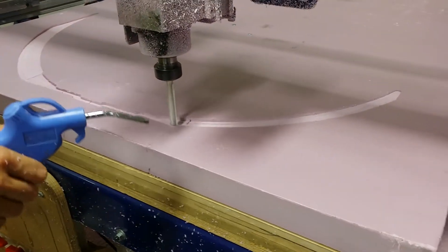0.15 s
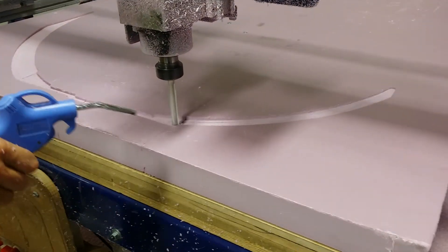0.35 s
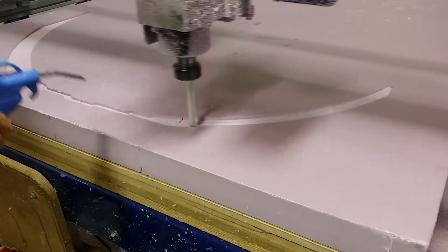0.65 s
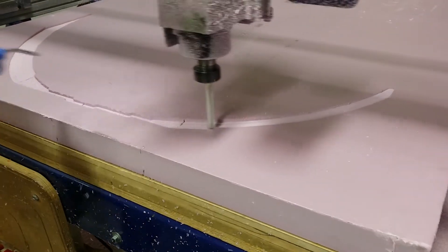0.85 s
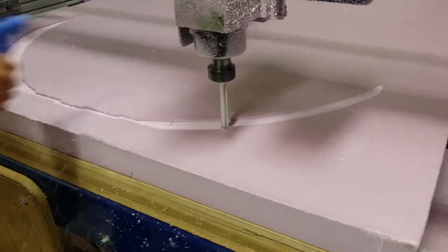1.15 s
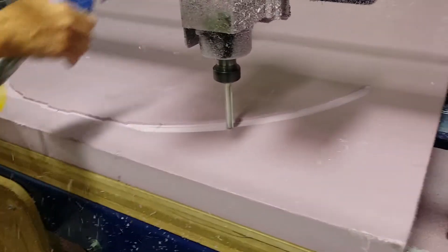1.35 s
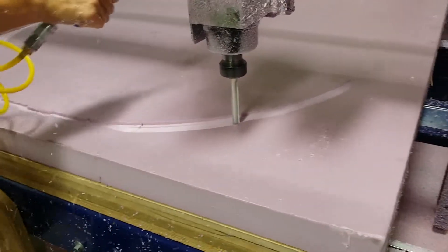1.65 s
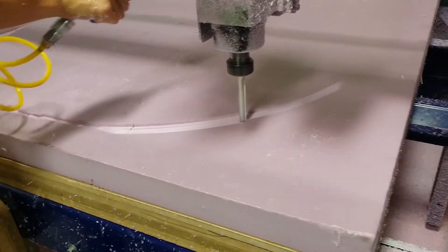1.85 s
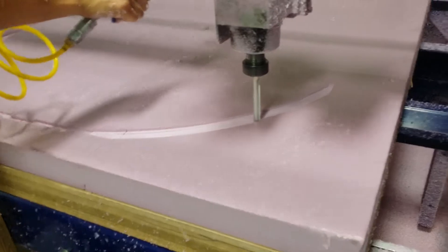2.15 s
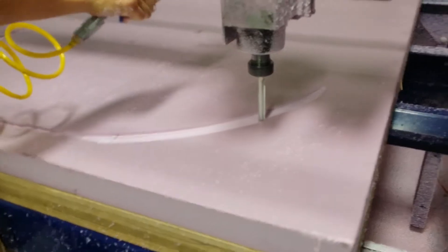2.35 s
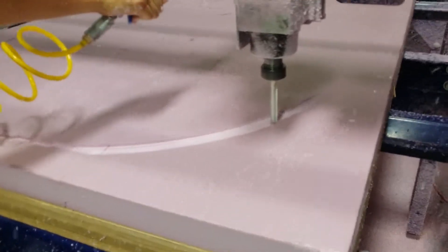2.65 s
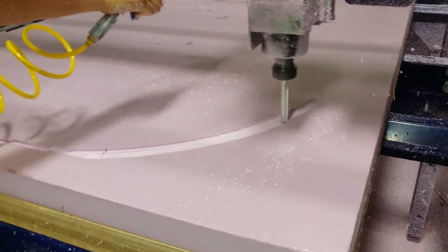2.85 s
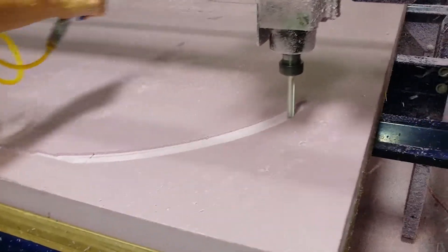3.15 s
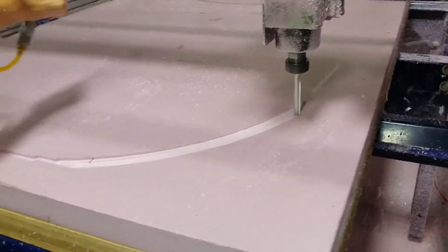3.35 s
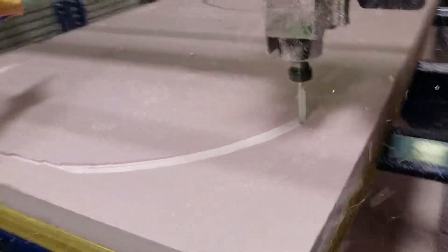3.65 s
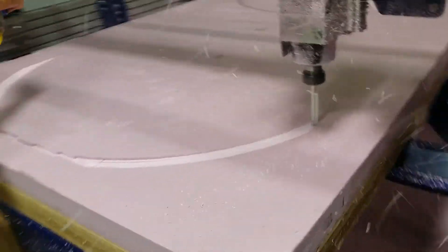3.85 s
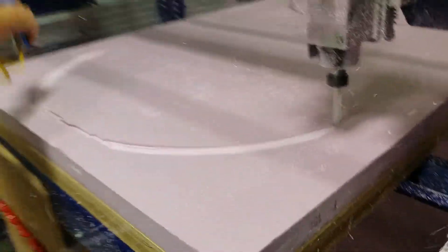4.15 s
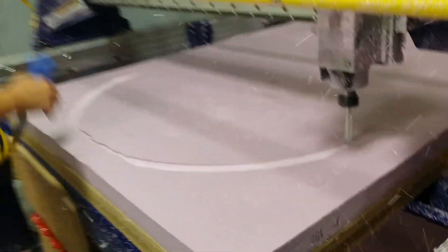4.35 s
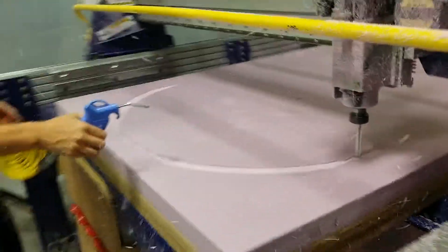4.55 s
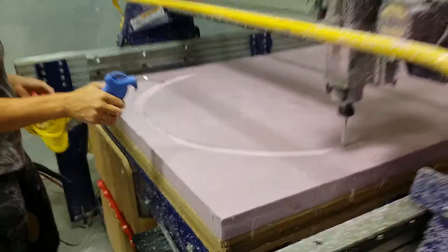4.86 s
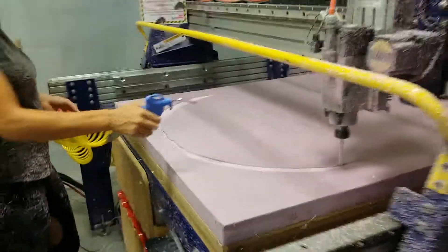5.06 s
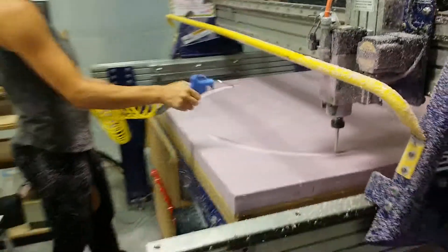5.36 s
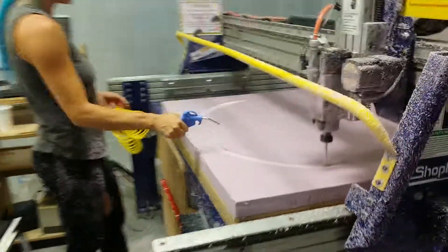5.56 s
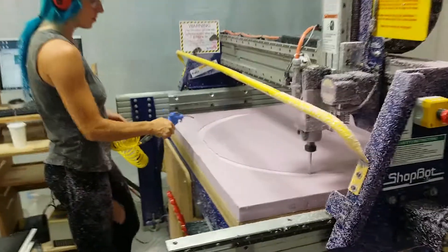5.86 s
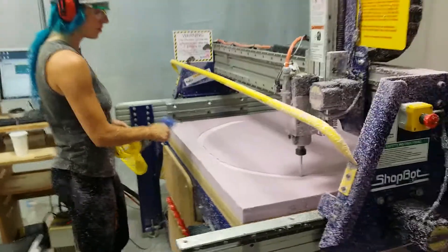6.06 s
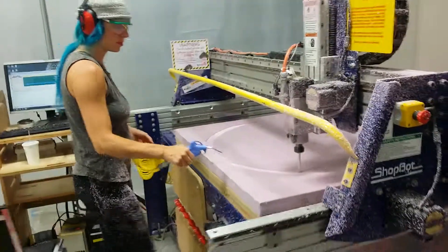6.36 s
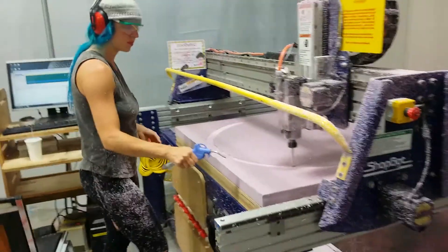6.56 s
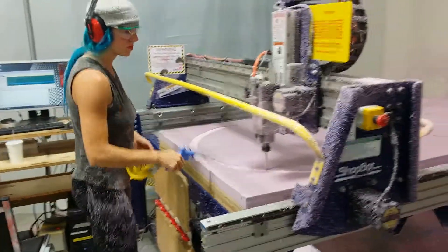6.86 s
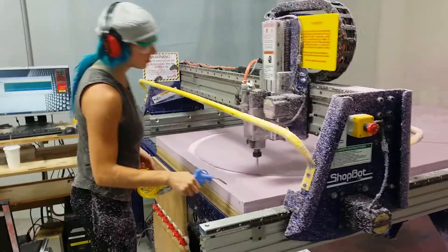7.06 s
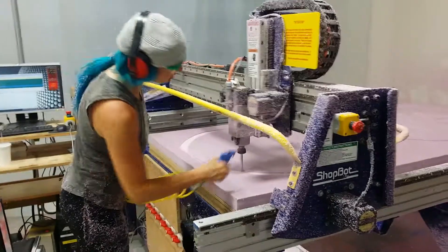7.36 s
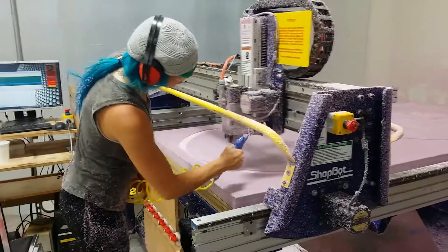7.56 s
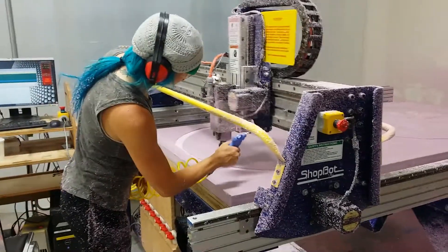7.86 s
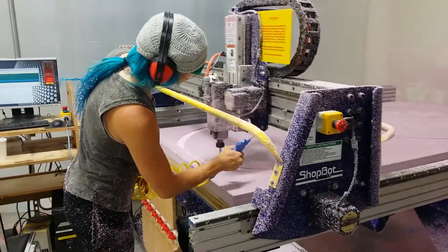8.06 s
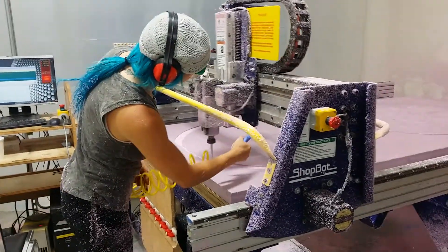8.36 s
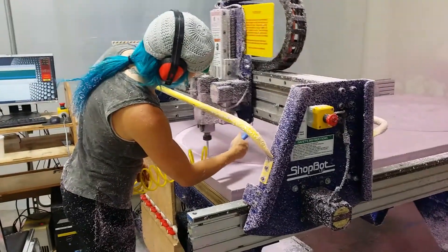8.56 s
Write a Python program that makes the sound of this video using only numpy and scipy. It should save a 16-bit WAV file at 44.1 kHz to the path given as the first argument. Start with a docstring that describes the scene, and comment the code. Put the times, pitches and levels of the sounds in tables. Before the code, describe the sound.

Loud hissing blasts of compressed air come and go over the steady whine and rasp of a machine router cutting foam.

```python
"""Workshop: an air gun blows chips off a CNC router cutting foam board.
The jet hisses in long bursts, roars where it hits the groove and once sweeps over the microphone.
The two-flute bit rasps and briefly chatters; the spindle whines at 300 turns a second.
Background: spindle fan, ringing gantry, drive motor tones, mains hum, shop rumble.
Low sounds sink away under loud hiss."""
import sys
import numpy as np
from scipy import signal
from scipy.fft import rfft, irfft, next_fast_len
from scipy.io import wavfile
from scipy.ndimage import uniform_filter1d, map_coordinates

SR = 44100
rng = np.random.default_rng(int(sys.argv[2]) if len(sys.argv) > 2 else 0)


def bounce(signal):
    """Save signal as a 16-bit WAV file at the path given by the first command-line argument."""
    frames = np.transpose(np.atleast_2d(signal))
    limited = np.clip(frames, -1, 1)
    pcm = np.round(limited * 32767).astype(np.int16)
    wavfile.write(sys.argv[1], SR, pcm)


N = 384993

# air blasts: (fully open [s], released [s], rise [s], fall [s], hiss [dB], sag [dB/s],
# roar re hiss [dB], sizzle re hiss [dB])
AIR_BLASTS = [(0.209, 1.026, 0.068, 0.12, -18.5, 5.5, -41, -2),
              (1.537, 4.006, 0.07, 0.18, -20, 1.4, -13.5, -2.5),
              (5.23, 7.164, 0.27, 0.34, -20.5, 0.04, -58, -3.5),
              (7.696, 8.08, 0.068, 0.27, -22.5, -1, -9, -1.5),
              (7.637, 7.66, .02, 0.045, -33.5, 0, -14, -15), (8.509, 8.585, 0.013, 0.16, -34, 0, -3, -14),
              (8.653, 8.733, 0.12, .1, -20.5, -10, -42, 0)]
# jet catching the groove: (time [s], half length [s], roar [dB], gust [dB], hiss gain [dB],
# sizzle gain [dB])
GROOVE_SURGES = [(0.118, 0.057, -34, -31, 8.5, -3), (0.274, 0.11, -40, -57, -0.5, -4),
                 (0.312, 0.015, -45, -35.5, 2, -2), (0.669, 0.029, -30, -25, 0, 0),
                 (1.596, 0.095, -21, -35, -0.5, 1), (1.96, 0.2, -28, -49, 1.8, -3.5),
                 (2.368, 0.15, -29, -74, 5.5, -24), (2.918, 0.072, -24.5, -55, 5.5, -2),
                 (3.22, 0.33, -59, -81, 2.5, 6.5), (3.47, 0.24, -32, -79, 2, -3),
                 (5.275, 0.2, -36, -67, 1.5, -0.5), (6.984, 0.13, -35.5, -76, -0.5, 1.5),
                 (7.8, 0.1, -30.5, -30.5, 0.5, -1), (8.002, 0.03, -22.5, -46, -0.5, 4.5)]
# nozzle-board gap: (time [s], half length [s], centre [Hz], half width [Hz], gain [dB])
GAP_RESONANCES = [(.4, 0.96, 6800, 503, 6), (.6, 0.27, 10660, 400, 8), (0.556, 0.1, 9600, 400, 9),
                  (1.7, 0.34, 1090, 200, 5.5), (2.25, 0.44, 5840, 450, 4.5), (2.352, 0.17, 7600, 400, 2),
                  (2.874, 0.025, 4870, 400, 6), (2.974, 0.022, 890, 227, 19),
                  (3.055, 0.075, 10600, 600, 13.5), (3.172, 0.13, 8950, 400, 7),
                  (3.5, 0.51, 11200, 400, 8.5), (3.315, 0.54, 3870, 610, -4.5), (3.5, 0.32, 5170, 400, 1.5),
                  (3.6, 0.59, 7030, 500, 4.5), (3.2, 0.96, 13000, 400, -10), (4.8, 0.52, 10700, 900, -17),
                  (5.318, 0.38, 7400, 600, 7), (6.3, 1, 4760, 1130, -4), (6.9, 0.24, 10300, 400, 7),
                  (7.655, 0.047, 6500, 900, 8), (7.9, 1, 7940, 900, 5), (7.963, 0.058, 3920, 745, 5.5),
                  (8.52, 0.048, 4140, 344, 9)]
# jet position: (time [s], left-right [dB])
JET_BALANCE = [(0, -1.3), (1.5, 0.5), (4.2, 1), (5.2, -1), (5.7, -3), (6.3, -1), (7.2, -2), (8.1, -1.5),
               (8.73, -1)]
# noise spectra: (frequency [Hz], level [dB])
HISS_SPECTRUM = [(1240, -105), (2100, -11.5), (2610, -8.5), (3720, -4.5), (4700, 0), (9030, 1), (10800, -2),
                 (12000, -6.5), (13900, -1), (14600, -23)]
ROAR_SPECTRUM = [(200, -80), (400, -99), (540, -32), (800, -20), (1020, -5.5), (1350, -5), (1680, -7),
                 (1900, -5), (2350, 0.5), (3300, 0), (4500, -4.5), (6500, -7), (11000, -45)]
SIZZLE_SPECTRUM = [(3000, -90), (8000, -11), (11000, -2), (12900, -1.5), (14600, -8)]
PUFF_SPECTRUM = [(25, -28), (55, -16), (90, 7.5), (170, 1.5), (300, -3), (500, -9), (900, -6), (1500, -11),
                 (3000, -16), (5000, -24), (9000, -56)]
# soft low bump at 2.14 s; jet striking the microphone at 3.14 s:
# (time [s], level [dB], half length [s])
LOW_PUFFS = [(2.14, -46, .022), (3.14, -27, .002), (3.146, -25, .003), (3.143, -32, .022), (3.15, -51, .07)]

# bit in the foam: (time [s], level [dB])
RASP_LEVEL = [(0, -34.5), (1.1, -30.5), (1.45, -30.5), (3.9, -35), (4.15, -33.5), (4.5, -35), (4.58, -47),
              (4.85, -47), (5.2, -51), (5.6, -63), (7.0, -32), (7.5, -32.5), (8.2, -34.5), (8.44, -36),
              (8.47, -37), (8.73, -43)]
CHATTER_LEVEL = [(3.8, -61), (4.05, -35), (4.2, -32.5), (4.5, -31), (4.53, -35), (4.59, -57)]
# rasp of the flutes: (frequency [Hz], level [dB])
RASP_SPECTRUM = [(400, -66), (620, -25), (800, -10), (970, -11), (1100, 2.5), (1300, -13.5), (1620, -1),
                 (1900, -3.5), (2400, -1), (3500, 0), (5000, 1), (7000, 2.5), (9000, -4), (10800, -3),
                 (12200, -5.5), (14400, -17)]
# ringing of the bit: (frequency [Hz], level re rasp [dB])
BIT_MODES = [(2930, -19.5), (6530, -15)]
# chatter lines: (frequency [Hz], level [dB], swell time [s], half length [s], swell [dB])
CHATTER_LINES = [(1720, -16.5, 4.18, .08, 3), (2080, -22, 4.25, .1, 2), (2362, -13, 4.09, .03, 9),
                 (2960, -18, 4.25, .1, 2), (3550, -12, 4.13, .03, 3), (4155, -15.5, 4.35, .025, 7),
                 (4760, -17, 4.46, .05, 9), (5065, -17, 4.46, .05, 6), (5300, -15, 4.25, .07, 5),
                 (5368, -8.5, 4.47, .04, 4), (5940, -17, 4.45, .1, 2)]

# spindle orders 1-4: (time [s], imbalance [dB], flutes [dB], third [dB], flute overtone [dB])
ORDER_LEVELS = [(0, -46.5, -39, -38, -49), (.45, -47.5, -48, -53, -46.5), (.8, -45, -39.5, -49, -40.5),
                (1.1, -45, -35.5, -48, -41), (1.48, -43.5, -37, -44, -43), (1.68, -43.5, -39, -46, -45),
                (2.05, -45, -44.5, -47, -48), (2.5, -48.5, -49.5, -49.5, -49),
                (2.75, -46.5, -50.5, -45.5, -43.5), (3.4, -53, -52, -51, -57),
                (3.85, -50, -47.5, -46, -45.5), (4.25, -53, -54.5, -58, -51), (4.68, -49, -59, -60, -59),
                (5.17, -44, -44.5, -52, -40.5), (5.4, -51, -48.5, -60, -57), (5.8, -52.5, -47, -72, -70),
                (6.15, -53, -53.5, -68, -50), (6.5, -53, -52, -51, -53), (7.1, -51.5, -45, -49, -54),
                (7.3, -52, -40.5, -46, -53), (7.75, -47.5, -42, -50, -51), (8.05, -51.5, -46.5, -57, -45),
                (8.4, -56.5, -46, -60, -51), (8.73, -59, -49, -60, -57)]
# whirr of fan and bearings: (time [s], level [dB])
WHIRR_LEVEL = [(0, -26), (.5, -32), (1.3, -35), (3, -30), (4.3, -38.5), (4.65, -38), (5.1, -28.5),
               (5.6, -33.5), (6.8, -31.5), (7.4, -33), (8.73, -41)]
# higher spindle tones: (order [per turn], level re whirr [dB])
MID_ORDERS = [(5, -22), (6, -25.5)]
WHINE_ORDERS = [(8, -28), (10, -26), (15, -26), (16, -20), (21, -24), (22, -14), (23, -18), (26, -19),
                (28, -20)]
# fan noise: (frequency [Hz], level [dB])
FAN_SPECTRUM = [(300, -70), (700, -50), (1200, -14), (1850, -9.5), (2400, 1), (3500, 0), (4300, -3),
                (5300, 4.5), (6700, 7), (8300, 2.5), (9500, 4), (11000, -4), (14600, -8)]

# gantry resonances: (centre [Hz], half width [Hz], gain [dB])
GANTRY_MODES = [(765, 26, 1), (1067, 14, 0.5), (1617, 22, -4), (1735, 26, 2), (2090, 35, 3),
                (2278, 35, 0.5)]
# shaking of the gantry by the cut: (frequency [Hz], level [dB])
GANTRY_DRIVE = [(350, -25), (700, 2.5), (2400, 2), (5000, -20)]
# gantry ringing, drive motor drone: (time [s], level [dB])
GANTRY_LEVEL = [(0, -38), (.6, -59), (1.2, -52), (2.2, -51), (3.5, -55), (4.6, -55), (5.4, -51), (6.3, -47),
                (7.0, -48), (7.5, -44.5), (8.2, -50), (8.73, -49)]
MOTOR_LEVEL = [(0, -48), (.6, -77), (4.3, -55), (4.65, -52), (4.95, -43.5), (5.25, -39), (5.55, -49),
               (6.75, -53), (7.3, -82), (8.73, -72)]
# drive motor tones: (frequency [Hz], level [dB])
MOTOR_TONES = [(816, -4.5), (869, -11)]
# shop background: (time [s], rumble [dB], hollow rush [dB])
SHOP_LEVELS = [(0, -44.5, -40), (.45, -51, -49), (1.2, -48, -40.5), (2.2, -52, -47), (3.05, -47.5, -40.5),
               (3.5, -52.5, -55), (3.85, -50.5, -36.5), (4.35, -49, -44), (4.85, -44.5, -41),
               (5.16, -34.5, -32), (5.3, -41.5, -45), (5.5, -50.5, -49), (6.3, -49.5, -54.5),
               (7.0, -49.5, -48), (7.62, -41.5, -39.5), (7.85, -48, -29), (8.05, -50.5, -33),
               (8.25, -51, -45.5), (8.73, -49.5, -51)]
# shop rumble, air over the table: (frequency [Hz], level [dB])
RUMBLE_SPECTRUM = [(20, -29), (50, -11), (80, 0.5), (115, 6), (150, 1), (190, 0), (260, -3), (340, -2.5),
                   (430, -33), (800, -40), (2000, -90)]
HOLLOW_SPECTRUM = [(100, -92), (250, -4), (370, -0.5), (435, -7), (490, -4), (560, 4), (700, 6.5), (850, 8),
                   (980, -1), (1130, -2.5), (1280, -10), (1420, 3), (1540, -5), (1720, 3), (1900, -38),
                   (2100, -42), (4000, -32), (9000, -60)]
# balance of the two microphone ports: (frequency [Hz], left-right [dB])
PORT_BALANCE = [(60, -2.5), (300, -3.5), (600, -5.5), (1000, -4.5), (2000, -10), (3000, -9), (5000, -6.5),
                (6000, -4.5), (7000, -6), (8200, -12), (10000, -10.5), (11000, -11.5), (12200, -4.5),
                (14000, -5)]
# likeness of the ports: (frequency [Hz], correlation [0-1])
PORT_COHERENCE = [(100, 0.64), (600, 0.34), (1200, 0.14), (2500, 0.089), (5000, 0.031), (14000, 0.018)]

RAMP_DB, SIZZLE_STEEPNESS = 16.5, 1.4  # change per rise or fall time; factor for the sizzle
TAIL_DB, TAIL_DB_PER_S = -11, 28.5
SURGE_EXPONENT = 3.1
EDDY_S, EDDY_LENGTH_S, EDDY_DB = 3.145, .0032, -21
GRIP_RATE_HZ, GRIP_DEPTH, SCRAPE_DEPTH = 110, .72, .42
TURN_HZ, MAINS_HZ, TOP_HZ = 299.8, 120, 14700
REPEAT_GAIN, REPEAT_TOP_HZ = .7, 9500
COVER_LOW_HZ, COVER_HIGH_HZ, COVER_LEAN_DB = 2200, 4500, 1
SHAKE_MARGIN_DB, SHAKE_DB, SHAKE_RAD, SHAKE_RATE_HZ = 11, 5, .6, 45
SINK_MARGIN_DB, SINK_KNEE_DB = 18, 0.37
TURN_SINK_DB, FLUTE_SINK_DB = 52, 35
RUMBLE_SINK_DB, HOLLOW_SINK_DB, HOLLOW_BASS_SINK_DB = 61, 3.5, 39


def air_gun(angle):
    """Jet hiss shaped by the gap, roar and gusts from the groove, nozzle sizzle, flying chips."""
    hiss_gain, roar_gain, gust_gain, sizzle_gain = jet_gains()
    pan_db, = curves(JET_BALANCE)
    hiss = hiss_gain * amp(-1.11) * rush(HISS_SPECTRUM, patchy_db=2.5, patch=(7, 11), resonance=gap_db)
    roar = roar_gain * amp(-2 + 1.1 * wobble(25))
    roar = roar * rush(ROAR_SPECTRUM, patchy_db=9.5, patch=(2, 7), resonance=gap_db)
    sizzle = sizzle_gain * amp(-3 + 0.3 * wobble(2.7))
    sizzle = sizzle * rush(SIZZLE_SPECTRUM, patchy_db=5.5, patch=(4, 9))
    gust = gust_gain * amp(-6.5) * rush(HOLLOW_SPECTRUM, patchy_db=10, patch=(2, 5))
    bit_chop = 1 + 0.017 * np.cos(angle) + 0.011 * np.cos(2 * angle)
    turbulence = amp(0.46 * wobble(30) + 0.27 * wobble(250))
    return (hiss + roar + gust + sizzle) * bit_chop * turbulence * pan(pan_db) + chips(hiss_gain)


def jet_gains():
    """Hiss, roar, gust and sizzle gains: blasts rise, sag, fall, linger; the groove adds surges."""
    t = np.arange(0, N, 32) / SR
    hiss = roar = gust = sizzle = 0
    for on_s, off_s, rise_s, fall_s, db, sag_db_per_s, roar_db, sizzle_db in AIR_BLASTS:
        shut_db = RAMP_DB * np.maximum(0, np.maximum((on_s - t) / rise_s, (t - off_s) / fall_s))
        open_db = db - sag_db_per_s * np.clip(t - on_s, 0, off_s - on_s)
        tail_db = open_db + TAIL_DB - TAIL_DB_PER_S * np.abs(t - off_s)
        room_tail = (t > off_s) * amp(tail_db) * (1 - amp(-shut_db))
        hiss = hiss + np.hypot(amp(open_db - shut_db), room_tail)
        roar = roar + amp(open_db + roar_db - shut_db)
        sizzle = sizzle + amp(open_db + sizzle_db - SIZZLE_STEEPNESS * shut_db)
    for at_s, half_s, roar_db, gust_db, hiss_db, sizzle_db in GROOVE_SURGES:
        swell = np.exp(-np.abs((t - at_s) / half_s) ** SURGE_EXPONENT)
        roar = np.hypot(roar, amp(roar_db) * swell)
        gust = gust + amp(gust_db) * swell
        hiss = hiss * amp(hiss_db * swell)
        sizzle = sizzle * amp(sizzle_db * swell)
    return curves(np.transpose([t, hiss, roar, gust, sizzle]))


def gap_db(hz, t):
    """Resonances of the nozzle-board gap swell and fade as the nozzle moves."""
    return sum(db * bell(t, at_s, half_s) * bell(hz, centre_hz, half_hz)
               for at_s, half_s, centre_hz, half_hz, db in GAP_RESONANCES)


def chips(jet_gain, rate_hz=45, decay_s=0.00092):
    """Chips tick against the machine, harder in a stronger jet."""
    hits = (rng.random(N) < rate_hz / SR) * np.sqrt(rng.exponential(size=N))
    t = np.arange(256) / SR
    tick = rng.standard_normal((2, len(t))) * np.exp(-t / decay_s)
    ticks = signal.fftconvolve(hits[None], tick, axes=1)[:, :N]
    return jet_gain * amp(-22) * spread(ticks, lambda hz: amp(along(HISS_SPECTRUM, hz)))


def puffs():
    """A soft low bump; a second later the jet buffets the microphone. Both mostly on the right."""
    t = np.arange(N) / SR
    swell = sum(amp(db) * bell(t, at_s, half_s) for at_s, db, half_s in LOW_PUFFS)
    u = (t - EDDY_S) / EDDY_LENGTH_S
    eddy = amp(EDDY_DB) * (1 - 2 * u ** 2) * np.exp(-u ** 2)  # suction, push, suction
    return swell * rush(PUFF_SPECTRUM, patchy_db=2) * amp([[-16], [3]]) + eddy * amp([[-20], [5]])


def cutting(angle):
    """The flutes rasp through the foam, slightly louder at each bite; the bit rings faintly."""
    level_db, = curves(RASP_LEVEL)
    bite = 1 + 0.025 * np.cos(angle) + 0.017 * np.cos(2 * angle)
    ring = sum(amp(db) * squeal(hz) for hz, db in BIT_MODES)
    gain = amp(level_db + 0.69 * wobble(25)) * bite
    return gain * (rush(RASP_SPECTRUM, patchy_db=8.5, patch=(3, 7)) + ring)


def chatter():
    """The bit rubs the groove wall; rough lines take the lead in turn."""
    level_db, = curves(CHATTER_LEVEL)
    t = np.arange(N) / SR
    return sum(amp(level_db + db + swell_db * bell(t, at_s, half_s)) * squeal(hz)
               for hz, db, at_s, half_s, swell_db in CHATTER_LINES)


def squeal(hz):
    """Rough line, rms 1, shaken by the bit's changing grip and faster scraping."""
    grip = 1 + GRIP_DEPTH * (wobble(GRIP_RATE_HZ) + 1j * wobble(GRIP_RATE_HZ))
    grip = grip + SCRAPE_DEPTH * wobble(300)
    phase = 2 * np.pi * hz * np.arange(N) / SR + np.angle(grip)
    arrival_rad = .5 * np.array([wobble(12), wobble(12)]) + np.array([[0], [np.pi / 2]])
    line = np.abs(grip) * np.cos(phase + arrival_rad) * pan(along(PORT_BALANCE, hz))
    return line / np.std(line.mean(0))


def spindle(angle, whirr_db, cover_db):
    """Imbalance sounds once a turn, the flutes twice; fan and bearings add the high orders."""
    turn_db, flute_db, third_db, overtone_db = curves(ORDER_LEVELS)
    turn_db = turn_db - TURN_SINK_DB * sunk(turn_db + 0.5 + 1.93 * wobble(27), cover_db)
    flute_db = flute_db - FLUTE_SINK_DB * sunk(flute_db + 3 + 3.9 * wobble(23), cover_db)
    orders = [(1, turn_db), (2, flute_db), (3, third_db), (4, overtone_db)]
    orders += [(order, whirr_db + db) for order, db in MID_ORDERS]
    hum = sum(low_order(order, angle, db, cover_db) for order, db in orders)
    whine = sum(amp(db) * tone(order * TURN_HZ, order * angle, waver_db=3.5, scatter_rad=.9)
                for order, db in WHINE_ORDERS)
    return hum + amp(whirr_db) * whine


def low_order(order, angle, level_db, cover_db):
    """Low spindle tone; wavers more under loud hiss."""
    shake = .5 + .5 * np.tanh((cover_db - level_db - SHAKE_MARGIN_DB) / 4)
    phase = order * angle + shake * SHAKE_RAD * wobble(SHAKE_RATE_HZ)
    flutter_db = shake * SHAKE_DB * np.minimum(wobble(SHAKE_RATE_HZ), 1)
    return amp(level_db + flutter_db) * tone(order * TURN_HZ, phase, waver_db=1.8, scatter_rad=.7)


def fan(angle, whirr_db):
    """Fan noise partly repeats every turn, which gathers it into fuzzy lines."""
    def comb(hz):
        repeat = REPEAT_GAIN / (1 + (hz / REPEAT_TOP_HZ) ** 6)
        return 1 / (1 - repeat * np.exp(-2j * np.pi * hz / TURN_HZ))
    pulse = 1 + 0.24 * np.cos(angle) + 0.44 * np.cos(2 * angle)
    return amp(whirr_db - 1) * unit(pulse) * rush(FAN_SPECTRUM, patchy_db=3, patch=(4, 7), response=comb)


def gantry():
    """The cut shakes the gantry's narrow resonances into a ragged hum."""
    def modes(hz):
        return sum(amp(db) / (1 + ((hz - centre_hz) / half_hz) ** 2)
                   for centre_hz, half_hz, db in GANTRY_MODES)
    level_db, = curves(GANTRY_LEVEL)
    return amp(level_db) * rush(GANTRY_DRIVE, patchy_db=10, patch=(3, 5), response=modes)


def drive_motors():
    """Motor drone, swelling to its loudest around 5.2 s."""
    level_db, = curves(MOTOR_LEVEL)
    t = np.arange(N) / SR
    return sum(amp(level_db + db) * tone(hz, 2 * np.pi * hz * t, waver_db=3, scatter_rad=.7)
               for hz, db in MOTOR_TONES)


def shop(cover_db):
    """Rumble, mains hum and the hollow rush of air over the table; the bass sinks under loud hiss."""
    rumble_db, hollow_db = curves(SHOP_LEVELS)
    sink = sunk(rumble_db + 1.42 * wobble(7.4), cover_db)
    hum = tone(MAINS_HZ, 2 * np.pi * MAINS_HZ * np.arange(N) / SR, waver_db=2.5, scatter_rad=.8)
    low_gain = amp(rumble_db - 1 - RUMBLE_SINK_DB * sink + 0.67 * wobble(12))
    rumble = rush(RUMBLE_SPECTRUM, patchy_db=8.5, patch=(2, 4))
    hollow_gain = amp(hollow_db - 2.5 - HOLLOW_SINK_DB * sink + .6 * wobble(12))
    hollow = hollow_gain * rush(HOLLOW_SPECTRUM, patchy_db=8.5, patch=(3, 4))
    bass = filtered(hollow, lambda hz: 1 / (1 + (hz / 520) ** 12))
    bass_sink = sunk(rumble_db - 0.5 + 0.42 * wobble(11), cover_db)
    hollow = hollow - bass * (1 - amp(-HOLLOW_BASS_SINK_DB * bass_sink))
    return low_gain * (amp(-4) * hum + amp(-1) * rumble) + hollow


def hiss_cover_db(hiss):
    """Running level of the lower hiss band, biased to the right port."""
    band = filtered(hiss.mean(0), lambda hz: (hz > COVER_LOW_HZ) & (hz < COVER_HIGH_HZ))
    power = np.abs(uniform_filter1d(band ** 2, size=2200))
    return 10 * np.log10(power + 1e-12) + COVER_LEAN_DB * np.array([[-1], [1]])


def sunk(level_db, cover_db):
    """How far (0-1) a low sound has sunk under the hiss."""
    return .5 + .5 * np.tanh((cover_db - level_db - SINK_MARGIN_DB) / (2 * SINK_KNEE_DB))


def rush(spectrum, patchy_db, patch=(5, 13), resonance=lambda hz, t: 0, response=lambda hz: 1):
    """Turbulent stereo noise: gain patches (bins, frames), moving resonance [dB], static response."""
    hz, t, bins = signal.stft(rng.standard_normal((2, N)), SR, nperseg=1024)
    field = uniform_filter1d(rng.standard_normal(bins.shape), patch[0], axis=1)
    field = uniform_filter1d(field, patch[1], axis=2)
    field = np.minimum(unit(field + field.mean(0)), 1)  # partly common to both ports; swells capped
    bins = bins * amp(patchy_db * field + resonance(hz[:, None], t))
    pair = signal.istft(bins, nperseg=1024)[1][:, :N]
    return spread(pair, lambda hz: amp(along(spectrum, hz)) * response(hz))


def tone(hz, phase, waver_db, scatter_rad):
    """Fluttering line; shifting reflections drift its phase at each port (scatter_rad at 1 kHz)."""
    sides = pan(along(PORT_BALANCE, hz))
    drift = np.array([wobble(2.96), wobble(3)]) * scatter_rad * np.sqrt(hz / 1000)
    strength = amp(waver_db * (0.42 * np.tanh(wobble(11)) + np.minimum(wobble(24), 1)))
    jitter = 0.12 * waver_db * wobble(30) * np.sqrt(hz / 1000)
    line = np.sin(phase + drift + jitter + rng.uniform(0, 2 * np.pi))
    return np.sqrt(2) * sides / sides.mean() * strength * line


def spread(pair, colour):
    """Two unrelated signals, coloured and mixed to the ports; their mean has rms 1."""
    def mid_side(hz):
        width_rad = np.arccos(np.clip(along(PORT_COHERENCE, hz), -1, 1)) / 2
        return colour(hz) * np.array([np.cos(width_rad), np.sin(width_rad)])
    mid, side = filtered(pair, mid_side)
    stereo = filtered(np.array([mid + side, mid - side]), lambda hz: pan(along(PORT_BALANCE, hz)))
    return stereo / np.std(stereo.mean(0))


def filtered(x, response):
    """Apply a frequency response."""
    size = next_fast_len(N + 8192)
    return irfft(rfft(x, size) * response(np.fft.rfftfreq(size, 1 / SR)), size)[..., :N]


def wobble(rate_hz):
    """Smooth random curve, rate_hz knots a second."""
    coarse = np.arange(0, N + 64, 64)
    knots = rng.standard_normal(int(N * rate_hz / SR) + 4)
    smooth = map_coordinates(knots, [coarse * rate_hz / SR], mode="nearest")
    return np.interp(np.arange(N), coarse, smooth)


def curves(rows):
    """Per-sample curve for each column after the time."""
    times_s, *columns = np.transpose(rows)
    return [np.interp(np.arange(N) / SR, times_s, column) for column in columns]


def along(points, hz):
    """Interpolate on a log frequency axis."""
    points_hz, values = np.transpose(points)
    return np.interp(np.log(hz + 1), np.log(points_hz + 1), values)


def bell(x, centre, half_width):
    """Gaussian, 1/e at half_width."""
    return np.exp(-((x - centre) / half_width) ** 2)


def pan(db):
    """Left-right dB to two gains."""
    return amp(db * np.array([[.5], [-.5]]))


def amp(db):
    """dB to gain."""
    return 10 ** (np.asarray(db) / 20)


def unit(x):
    """Scale to rms 1."""
    return x / np.sqrt(np.mean(x ** 2) + 1e-20)


def scene():
    """Air gun, router and shop; the low sounds sink away whenever the hiss of fan, cut and jet is loud."""
    speed_hz = TURN_HZ * (1 + 0.000294 * wobble(2.8) + 0.00083 * wobble(40))
    angle = 2 * np.pi * np.cumsum(speed_hz) / SR
    whirr_db, = curves(WHIRR_LEVEL)
    hiss = fan(angle, whirr_db) + cutting(angle) + air_gun(angle)
    cover_db = hiss_cover_db(hiss)
    machine = spindle(angle, whirr_db, cover_db) + gantry() + chatter()
    return hiss + machine + puffs() + drive_motors() + shop(cover_db)


def record(dry):
    """Hard limit at full scale, then cut above TOP_HZ."""
    return filtered(np.clip(dry, -1, 1), lambda hz: hz < TOP_HZ)


dry = scene()
out = record(dry)
bounce(out)
```